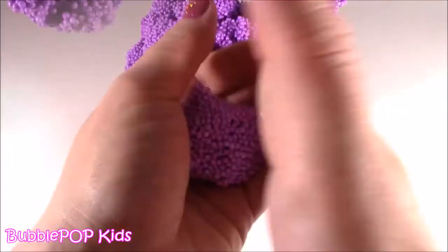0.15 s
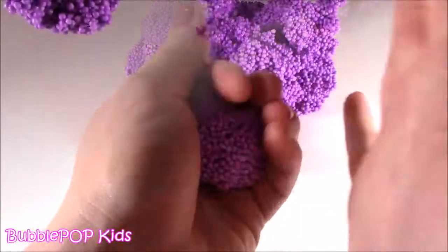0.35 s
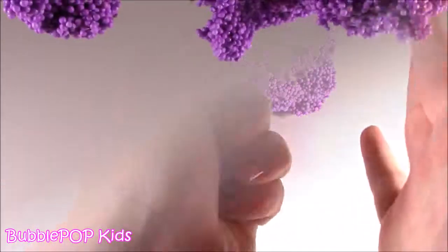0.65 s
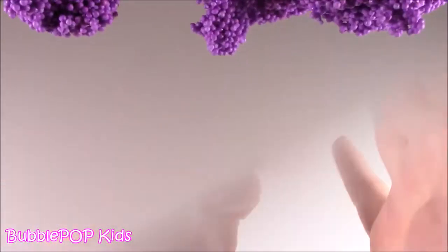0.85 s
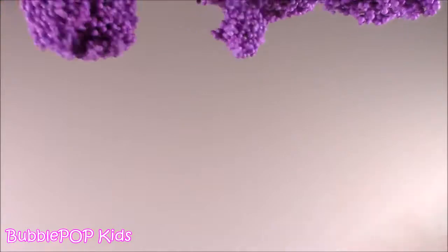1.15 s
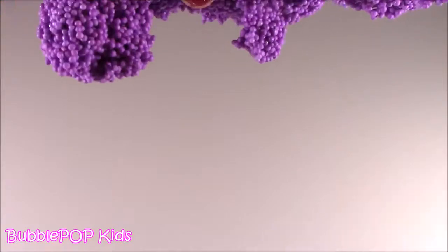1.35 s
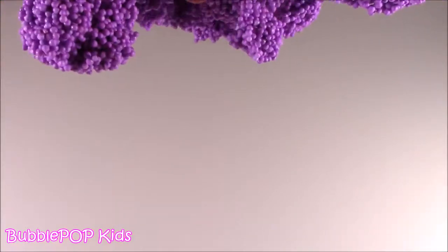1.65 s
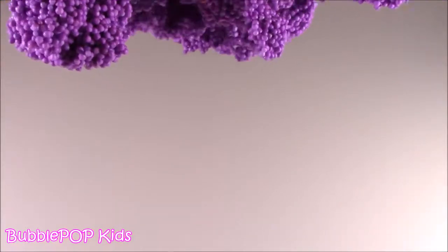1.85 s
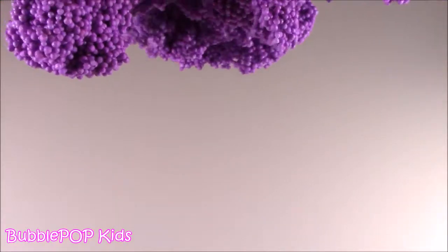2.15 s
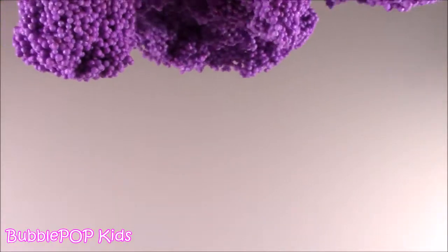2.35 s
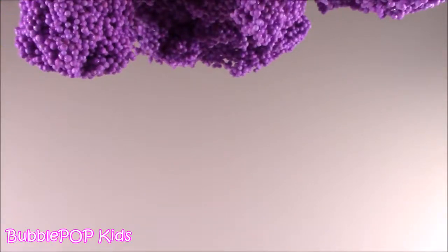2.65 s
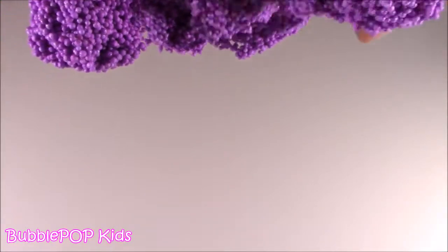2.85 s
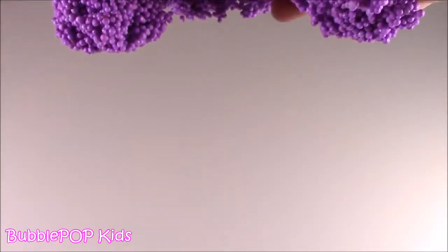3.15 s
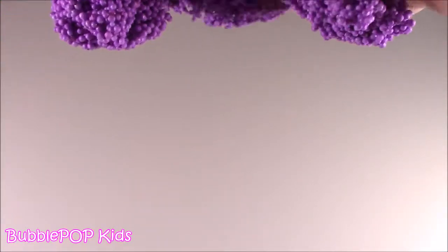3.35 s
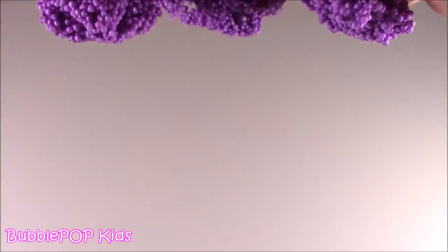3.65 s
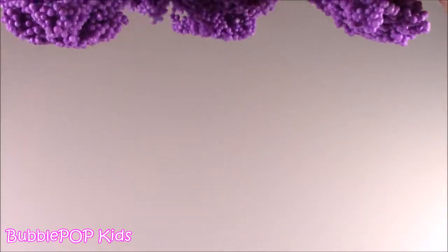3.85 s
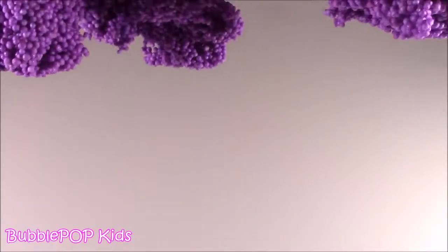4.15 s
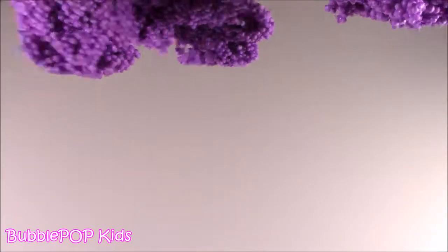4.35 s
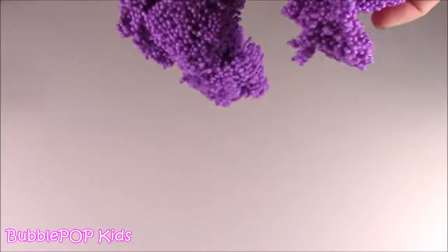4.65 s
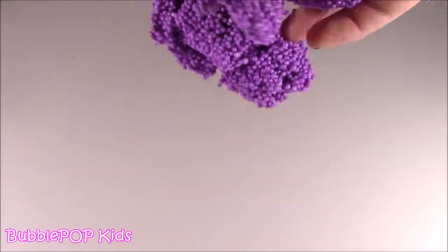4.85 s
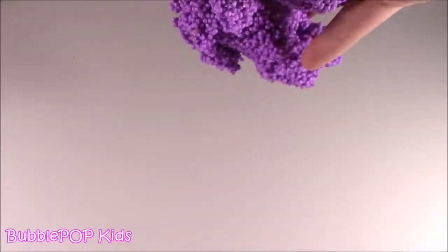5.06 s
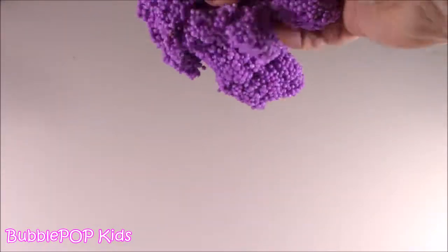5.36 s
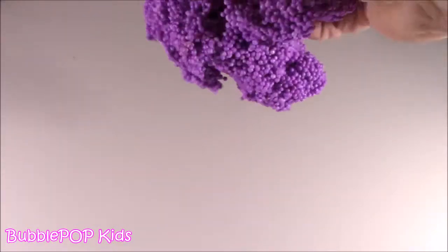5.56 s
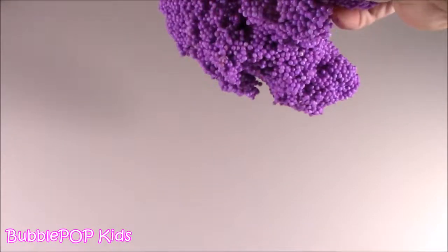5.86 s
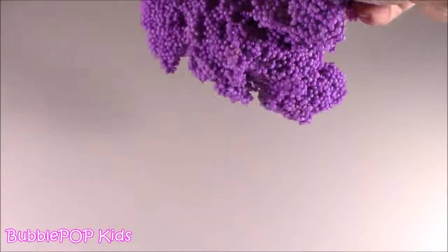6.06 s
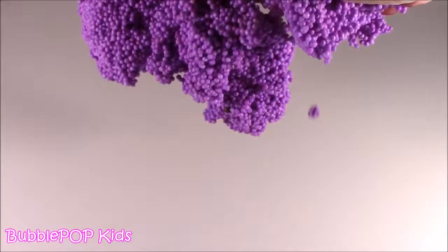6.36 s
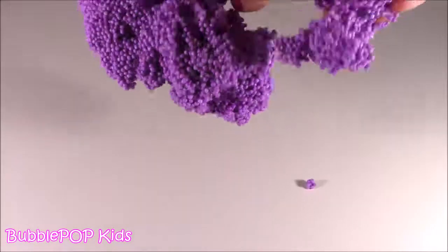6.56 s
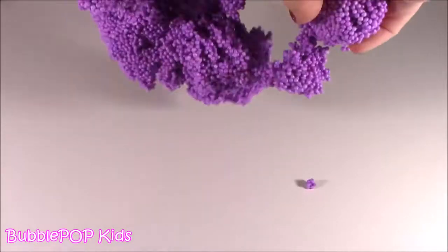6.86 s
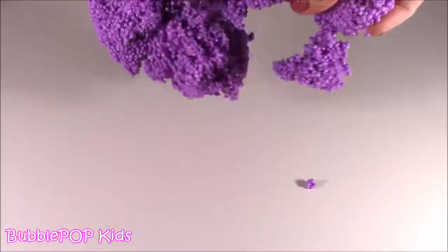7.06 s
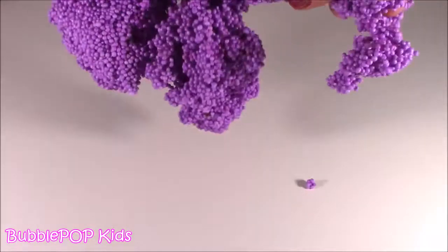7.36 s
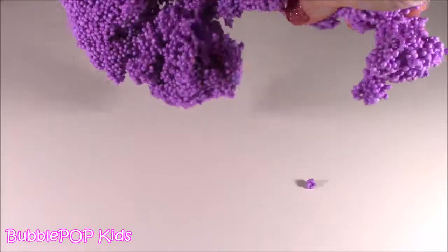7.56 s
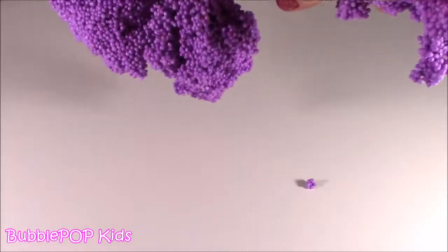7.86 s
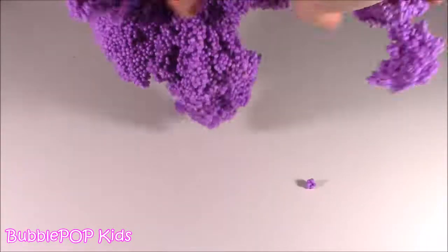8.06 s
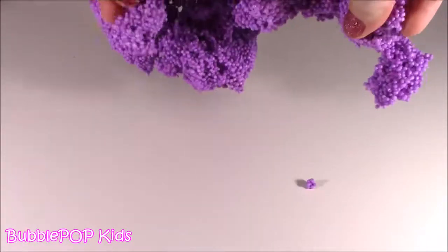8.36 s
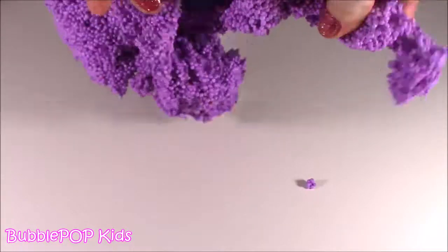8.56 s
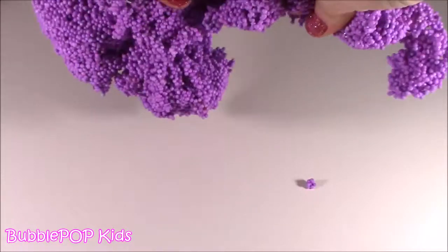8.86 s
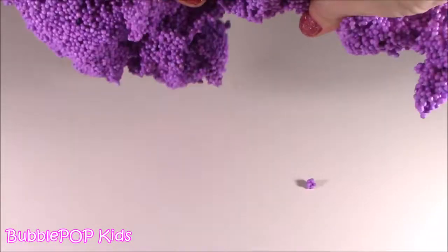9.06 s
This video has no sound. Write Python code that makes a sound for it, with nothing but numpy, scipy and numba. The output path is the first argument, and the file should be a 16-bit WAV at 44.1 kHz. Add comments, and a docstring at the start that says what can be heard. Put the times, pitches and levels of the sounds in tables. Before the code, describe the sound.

Close crunchy crackle of foam-bead putty being kneaded and pulled apart, with sharp pops, dull rustles, soft bumps and brief lulls.

```python
"""Foam-bead compound kneaded and torn

Hands squeeze a sticky foam-bead compound and tear it apart over a table, heard close up in a small quiet room.
Glue threads snap in showers of tiny damped rings, air pockets pop lower down and the kneaded mass rustles dully.
Single snaps and quick crunches add a ring and a gritty crack, hollows resonate as they are pressed shut,
and now and then a lump bumps the table with a low swing and a scuff. Close echoes and a steady low rush surround it."""
import sys
import numpy as np
from scipy import signal
from scipy.fft import rfft, irfft
from scipy.io import wavfile
from numba import njit

SR = 44100
rng = np.random.default_rng(int(sys.argv[2]) if len(sys.argv) > 2 else 0)


def dump(signal):
    """Clip the signal to [-1, 1] and save it as 16-bit WAV at the path in sys.argv[1]."""
    limited = np.clip(np.atleast_2d(signal).T, -1, 1)
    pcm = np.round(limited * 32767).astype(np.int16)
    wavfile.write(sys.argv[1], SR, pcm)


N = 406161  # length in samples


def amp(db):
    """Decibels to gain."""
    return 10 ** (np.asarray(db) / 20)


def rms(x):
    """Root mean square."""
    return np.sqrt(np.mean(x ** 2))


def fade(t, t60):
    """Exponential decay, 60 dB down after t60."""
    return np.exp(-np.log(1000) * t / t60)


def add(track, s, sound):
    """Mix a sound into the track at time s."""
    i = max(int(s * SR), 0)
    track[i:i + len(sound)] += sound[:max(N - i, 0)]


def band(x, lo_hz, hi_hz):
    """Gentle causal band-pass."""
    return signal.sosfilt(signal.butter(2, [lo_hz, hi_hz], "band", fs=SR, output="sos"), x)


def colour(x, points, size=4096):
    """Causal minimum-phase filter through (Hz, dB) points, so that clicks keep their sharp fronts."""
    hz, db = np.transpose(points)
    bins_hz = np.arange(size // 2 + 1) * SR / size
    gain = amp(np.interp(np.log(bins_hz + 1), np.log(hz), db))
    # folding the cepstrum forward in time gives the minimum phase
    cepstrum = irfft(np.log(gain))[:size // 2]
    cepstrum[1:] *= 2
    impulse = irfft(np.exp(rfft(cepstrum, size)))
    return signal.fftconvolve(x, impulse)[:len(x)]


def compound(threads_db, pockets_db, mass_db):
    """Threads, lone bead ticks, air pockets and the shifting mass, all surging together."""
    surge_db = avalanches() + lurches()
    bright = amp(-0.65) * threads(threads_db, surge_db) + amp(-5.5) * beads(threads_db, surge_db)
    dull = pockets(pockets_db, surge_db) + amp(4.0) * mass(mass_db, surge_db)
    return bright + dull


# Tone of the snapping threads and beads: pitch_hz [Hz], gain_db [dB]
THREAD_COLOUR = [(300, -31.5), (1000, -9.5), (1800, -1), (2900, 0), (4000, 3), (4700, -0.5), (5700, 3),
                 (7000, -2), (8200, -9), (9500, -21.5)]


def threads(level_db, surge_db):
    """Glue threads between the beads part in a dense bright crackle of nearly even grains."""
    return shower(level_db, THREAD_COLOUR, rate=2000, growth=0.45, lo_hz=1450, hi_hz=9860,
                  cycles=5.7, spread_db=0.5, ceiling=3.5, surge_db=0.63 * surge_db)


def beads(level_db, surge_db):
    """Lone ticks of beads: sparse, drier than the threads and very uneven in strength."""
    return shower(level_db, THREAD_COLOUR, rate=110, growth=0.41, lo_hz=2030, hi_hz=8950,
                  cycles=2.9, spread_db=4.0, ceiling=3.2, surge_db=0.68 * surge_db)


# Tone of the bursting air pockets: pitch_hz [Hz], gain_db [dB]
POCKET_COLOUR = [(250, -20.5), (540, -8), (740, 1), (920, -3), (1120, -0.5), (1400, 0.5), (1790, -1.5),
                 (2200, -2.5), (3400, -2), (5000, -39)]


def pockets(level_db, surge_db):
    """Air pockets burst with lower pops that ring for more cycles."""
    return shower(level_db, POCKET_COLOUR, rate=800, growth=.7, lo_hz=555, hi_hz=3120,
                  cycles=8.8, spread_db=2.0, ceiling=3.5, surge_db=0.68 * surge_db)


# Tone of the kneaded mass: pitch_hz [Hz], gain_db [dB]
MASS_COLOUR = [(40, -20), (90, -5.5), (135, -0.5), (185, -0.5), (240, -6.5), (310, 3.5), (400, 1.5),
               (500, -0.5), (700, -2), (1500, -15.5)]


def mass(level_db, surge_db):
    """The whole mass shifts with a dull low rustle."""
    return shower(level_db, MASS_COLOUR, rate=320, growth=.3, lo_hz=71.5, hi_hz=674,
                  cycles=5.3, spread_db=2.5, ceiling=2.7, surge_db=0.92 * surge_db)


def shower(curve, points, rate, growth, lo_hz, hi_hz, cycles, spread_db, ceiling, surge_db,
           idle=.08, count=90000):
    """Random grains, about rate a second at the curve's mean dB; harder work frees more and larger ones."""
    when, keep, pitch, strength, sign = rng.random((count, 5)).T
    start = (when * N).astype(int)
    db = curve[start]
    most = count * SR / N  # densest possible shower, grains per s
    density = np.minimum(rate * (idle + amp(growth * (db - np.mean(curve)))), most)
    hz = lo_hz + (hi_hz - lo_hz) * pitch
    t60 = cycles / hz
    # most grains are faint and a few stand out, up to the strength of the glue
    excess_db = spread_db * np.minimum(-np.log(1 - strength), ceiling)
    size = amp(db + excess_db + surge_db[start]) * np.sign(sign - .5) / np.sqrt(density * t60)
    pole = fade(1 / SR, t60) * np.exp(2j * np.pi * hz / SR)
    length = (t60 * SR).astype(int)
    on = keep < density / most
    out = colour(ring(start[on], pole[on], size[on], length[on]), points)
    # settle the overall level on the curve
    return out / rms(out / amp(curve))


@njit
def ring(start, pole, size, length):
    """Sum of short damped oscillations, one for each grain."""
    out = np.zeros(N)
    for k in range(len(start)):
        z = size[k] + 0j
        for i in range(start[k], min(start[k] + length[k], N)):
            out[i] += z.imag
            z *= pole[k]
    return out


def avalanches(rate=110, t60=0.02, spread_db=3.0, ceiling=0.76, size=2000):
    """Brief surges in dB: one thread that parts overloads its neighbours, and the run dies out in some ms."""
    chance, strength = rng.random((2, N))
    kick = amp(spread_db * np.minimum(-np.log(1 - strength), ceiling))
    triggers = (chance < rate / SR) * kick
    surge = np.convolve(triggers, fade(np.arange(size) / SR, t60))[:N]
    return 20 * np.log10(1 + surge)


def lurches(rate=14, spread_db=2.9):
    """Slower unevenness, in dB: the compound sticks and gives several times a second."""
    knots = rng.standard_normal(300)
    return spread_db * np.interp(np.arange(N) / SR * rate, np.arange(len(knots)), knots)


# Pulls that stretch and tear the compound: start_s [s], hardest_s [s], let_go_s [s],
# threads_db [dB], pockets_db [dB]
PULLS = [(.45, .53, 0.63, -53, -55), (1.13, 1.16, 1.62, -59, -66), (1.68, 1.9, 2.1, -52.5, -58.5),
         (2.13, 2.36, 2.8, -42, -47.5), (2.82, 3.23, 3.5, -42.5, -47.5), (3.4, 3.8, 4.163, -37.5, -43),
         (4.96, 5.0, 5.1, -44.5, -50.5), (5.15, 5.4, 5.42, -43, -49), (5.42, 5.56, 5.7, -35, -42.5),
         (5.74, 6.06, 6.16, -30, -38), (6.19, 6.25, 6.37, -34.5, -40), (6.92, 6.99, 7.01, -50, -65.5),
         (7.02, 7.04, 7.15, -42, -54), (7.18, 7.3, 7.52, -33, -45), (7.545, 7.62, 7.68, -29.5, -44),
         (7.7, 7.75, 7.776, -35.5, -41), (8.4, 8.48, 8.52, -39, -54), (8.53, 8.87, 9.16, -29.5, -43.5)]
# Squeezes that knead it: start_s [s], hardest_s [s], let_go_s [s], pockets_db [dB], mass_db [dB]
SQUEEZES = [(.3, .62, .66, -60, -59.5), (.9, 1.1, 1.38, -52, -53.5), (.97, 1.05, 1.08, -42, -52),
            (2.86, 3.3, 4, -50.5, -60), (3.46, 3.7, 3.6, -52.5, -52.5), (4.33, 4.41, 4.43, -36, -45.5),
            (4.55, 4.56, 4.64, -51.5, -56.5), (4.65, 4.66, 4.69, -45, -50), (4.73, 4.74, 4.81, -47, -51),
            (4.8, 5.05, 5.1, -50, -57), (5.28, 5.3, 5.36, -54.5, -54.5), (5.56, 5.59, 5.63, -42.5, -43),
            (6.28, 6.33, 6.39, -38, -51.5), (6.5, 6.6, 6.87, -44.5, -50), (7.89, 7.9, 8.09, -44.5, -51.5),
            (8.17, 8.19, 8.24, -45, -47), (8.268, 8.28, 8.36, -46, -59.5), (8.54, 8.55, 8.58, -38, -49),
            (8.88, 8.92, 8.95, -41, -55)]
# every gesture: quick grip, swell up to its hardest moment, easing, release
PULL_SHAPE = dict(attack_db_per_s=290, swell_db=5.5, ease_db=4, release_db_per_s=149)
SQUEEZE_SHAPE = dict(attack_db_per_s=178.5, swell_db=6.5, ease_db=7, release_db_per_s=188)
RESTING_THREADS_DB, RESTING_POCKETS_DB, RESTING_MASS_DB = -70, -63.5, -65  # the compound creeps in the hands
SQUEEZE_THREADS_DB = -2.5  # threads torn by a squeeze, against its pockets
PULL_MASS_DB = -13  # mass dragged by a pull, against its pockets


def handwork():
    """Levels in dB: pulls tear threads and burst pockets, squeezes burst pockets and shift the mass."""
    pull_threads, pull_pockets = effort(PULLS, PULL_SHAPE)
    squeeze_pockets, squeeze_mass = effort(SQUEEZES, SQUEEZE_SHAPE)
    squeeze_threads = amp(SQUEEZE_THREADS_DB) ** 2 * squeeze_pockets
    pull_mass = amp(PULL_MASS_DB) ** 2 * pull_pockets
    thread_power = pull_threads + squeeze_threads + amp(RESTING_THREADS_DB) ** 2
    pocket_power = pull_pockets + squeeze_pockets + amp(RESTING_POCKETS_DB) ** 2
    mass_power = pull_mass + squeeze_mass + amp(RESTING_MASS_DB) ** 2
    return 10 * np.log10([thread_power, pocket_power, mass_power])


def effort(rows, shape):
    """Summed power of a table of gestures, for each of its two level columns."""
    return sum(np.outer(amp(row[3:]) ** 2, gesture(*row[:3], **shape)) for row in rows)


def gesture(start, hardest, end, attack_db_per_s, swell_db, ease_db, release_db_per_s):
    """Power of one movement of the hands over time, 1 at its hardest."""
    t = np.arange(N) / SR
    held_db = np.interp(t, [start, hardest, end], [-swell_db, 0, -ease_db])
    edges_db = attack_db_per_s * np.maximum(start - t, 0) + release_db_per_s * np.maximum(t - end, 0)
    return amp(np.maximum(held_db - edges_db, -100)) ** 2


# Hollows, such as the space between cupped hands, as they are pressed shut: start_s [s], hardest_s [s], shut_s
# [s], # level_db [dB], pitch_hz [Hz], width_hz [Hz]
HOLLOWS = [(0.941, 1.044, 1.045, -40, 1440, 485), (0.96, 1.008, 1.06, -42.5, 900, 260),
           (1.002, 1.015, 1.074, -39, 2840, 219), (6.572, 6.595, 6.61, -36, 362, 260)]
HOLLOW_SHAPE = dict(attack_db_per_s=1797, swell_db=4.5, ease_db=3, release_db_per_s=1000)


def hollow(rate=1100):
    """Breaking threads ring the air in a hollow, such as between cupped hands, which gives a throaty crunch or
    a round pop."""
    out = np.zeros(N)
    clicks = (rng.random(N) < rate / SR) * rng.uniform(-1.3, 1, N)
    for start, hardest, shut, db, hz, width in HOLLOWS:
        ringing = band(clicks, hz - width / 2, hz + width / 2)
        press = np.sqrt(gesture(start, hardest, shut, **HOLLOW_SHAPE))
        out += amp(db) * ringing / rms(ringing) * press
    return out


# Single snaps that stand out: start_s [s], level_db [dB, peak of the pop before crack and trim], pitch_hz [Hz]
SNAPS = [(.322, -41, 2300), (.515, -43, 4230), (0.551, -32, 5000), (0.6173, -33.5, 1580),
         (.641, -34.5, 930), (.892, -35, 1080), (.963, -25.5, 4210), (0.9922, -19, 2200),
         (1.0126, -14.5, 4500), (1.0509, -15.5, 1460), (1.0525, -17, 5300), (1.0645, -6, 2850),
         (1.0745, -21, 4700), (1.09, -18, 3180), (1.171, -27, 3750), (1.3613, -26, 1980),
         (1.599, -32.5, 5700), (1.6496, -29, 1170), (1.651, -30, 4160), (1.893, -38, 1107),
         (2.062, -29, 4300), (2.1075, -21, 3600), (2.5774, -16, 4784), (2.6692, -21, 4970),
         (2.7827, -18.5, 4260), (2.957, -23.5, 3690), (3.1112, -19.5, 3454), (3.4688, -15.5, 5100),
         (4.1385, -12, 3970), (4.245, -26.5, 3320), (4.437, -24, 1550), (4.5447, -14.5, 2940),
         (4.6609, -19, 1480), (4.684, -20, 1930), (4.7207, -23, 1870), (4.7405, -20.5, 2456),
         (4.8009, -19, 3180), (4.811, -25, 1520), (4.9724, -25, 2943), (5.3773, -25.5, 2020),
         (5.5424, -15.5, 4830), (5.557, -21, 1719), (5.8858, -5.5, 4340), (5.934, -22, 1122),
         (6.0842, -7.5, 4600), (6.1005, -8.5, 3670), (6.3185, -28, 5500), (6.3287, -6, 1450),
         (6.369, -17, 2100), (6.555, -21.5, 2370), (6.677, -18, 3570), (7.072, -20.5, 5380),
         (7.2597, -20, 5440), (7.3079, -17, 1490), (7.5494, -11, 3780), (7.5957, -7.5, 5510),
         (7.637, -14, 5560), (7.6513, -21, 4000), (7.6595, -9, 5180), (7.7728, -14.5, 5150),
         (7.8956, -24, 2165), (8.069, -28, 1910), (8.0812, -28.5, 1646), (8.126, -29.5, 1420),
         (8.268, -24, 2790), (8.281, -25, 2470), (8.373, -20.5, 3970), (8.387, -26, 2916),
         (8.432, -23, 3780), (8.444, -23.5, 2230), (8.4895, -10.5, 5160), (8.533, -11.5, 3950),
         (8.562, -11.5, 5060), (8.7, -9, 4460), (8.8048, -13, 3300), (8.895, -11, 4250),
         (8.9039, 3.5, 4500), (8.9125, -7, 3890), (8.9955, -15, 1500), (9.029, -24, 6920)]


def all_snaps(threads_db):
    """Single snaps, the runs inside crunches and the chance snaps of the crackle, all sounded alike."""
    return snaps([*SNAPS, *crunch_snaps(), *lesser_snaps(threads_db)])


def snaps(rows, ring_t60=0.00095, cycles=6.1, second_s=0.000894, second_hz=5100, second_octaves=.4,
          second_db=-6, second_t60=0.0029, crack_t60=0.0078, crack_db=-13, crack_growth=0.86,
          body_hz=1580, body_db=-15, body_t60=0.0069, top_hz=7900, size=2000):
    """A strand or pocket rings, a thin neighbour follows, the lump is knocked; small snaps crack relatively more."""
    out, t = np.zeros(N), np.arange(size) / SR
    later = np.maximum(t - second_s, 0)
    neighbours_hz = second_hz * 2 ** (second_octaves * rng.uniform(-1.06, 1, len(rows)))
    noise = rng.standard_normal((len(rows), size))
    cracks = band(noise * np.abs(noise), lo_hz=1010, hi_hz=top_hz)  # spiky noise sounds gritty
    body = amp(body_db) * np.sin(2 * np.pi * body_hz * t) * fade(t, body_t60)
    for (s, db, hz), neighbour_hz, crack in zip(rows, neighbours_hz, cracks):
        strand = np.sin(2 * np.pi * hz * t) * fade(t, ring_t60 + cycles / hz)
        neighbour = amp(second_db) * np.sin(2 * np.pi * neighbour_hz * later) * fade(later, second_t60)
        neighbour = neighbour * min(np.sqrt(hz / second_hz), 1)
        # a small source radiates little below its own pitch
        pop = band(strand + body + neighbour, lo_hz=min(0.48 * hz, 1100), hi_hz=top_hz)
        grit = amp(crack_db + crack_growth * db) * crack / rms(crack) * fade(t, crack_t60)
        add(out, s, amp(db) * pop / np.max(np.abs(pop)) + grit)
    return amp(-2.0) * signal.sosfilt(signal.butter(4, top_hz, fs=SR, output="sos"), out)


# Crunches, where a clump of beads gives way in a quick run of snaps: start_s [s],
# level_db [dB, strongest possible snap, as in SNAPS], pitch_hz [Hz, centre], length_s [s]
CRUNCHES = [(1.0135, -28, 3900, 0.0065), (1.062, -16.5, 3900, 0.0057), (1.275, -34.5, 2520, 0.0053),
            (2.821, -19, 2830, 0.015), (4.413, -18, 2780, 0.0093), (4.548, -26.5, 2270, 0.0088),
            (4.642, -26.5, 2200, 0.0072), (4.683, -25, 1670, 0.0079), (4.739, -25, 2370, 0.008),
            (4.802, -31, 2200, 0.0024), (5.581, -21, 2020, 0.0082), (5.606, -16.5, 2980, .012),
            (6.208, -14, 3960, 0.0087), (6.25, -15.5, 3270, 0.019), (7.282, -21, 4000, .01),
            (7.415, -13, 3970, 0.0087), (8.622, -16, 4100, 0.0084), (8.673, -14, 3870, .012),
            (8.702, -16, 2940, 0.0078), (8.779, -13, 3380, 0.0073), (8.926, -8, 3450, .018)]


def crunch_snaps(spread_db=6, spread_octaves=0.92, count=5):
    """Snap rows within each crunch: unevenly spaced, each with its own strength and pitch."""
    rows = []
    for s, db, hz, length in CRUNCHES:
        when, weakness, pitch = rng.random((count, 3)).T
        times = s + length * (np.arange(count) + when) / count
        pitches_hz = hz * 2 ** (spread_octaves * (2 * pitch - 1))
        rows += zip(times, db - spread_db * weakness, pitches_hz)
    return rows


def lesser_snaps(threads_db, above_db=6.5, spread_db=2.5, lo_hz=1600, hi_hz=6000, count=110):
    """Snap rows at chance moments, their levels set above that of the threads around them."""
    when, strength, pitch = rng.random((count, 3)).T
    db = threads_db[(when * N).astype(int)] + above_db + spread_db * (2 * strength - 1)
    return np.transpose([when * N / SR, db, lo_hz + (hi_hz - lo_hz) * pitch])


# Lumps and fingers bumping down: start_s [s], level_db [dB, of the swing before band-pass],
# pitch_hz [Hz], t60_s [s]
BUMPS = [(0.612, -38.5, 114.4, 0.031), (1.064, -31.5, 116.1, 0.032), (1.65, -32, 349, 0.014),
         (1.894, -31.5, 152.8, 0.019), (2.826, -35, 114, 0.079), (3.468, -24, 146, 0.06),
         (4.408, -34, 131, 0.13), (4.65, -28, 364, 0.03), (4.66, -24, 124, 0.021), (5.626, -39, 169, 0.025),
         (5.754, -30.5, 122, 0.027), (5.987, -28, 368, 0.035), (6.508, -27.5, 445, 0.025),
         (6.6762, -28, 298, 0.018), (8.1255, -29, 420.6, 0.019)]


def bumps(scuff_db=-3, size=9000):
    """A soft lump meets the table: one damped low swing and a dull scuff of beads."""
    out, t = np.zeros(N), np.arange(size) / SR
    for (s, db, hz, t60), noise in zip(BUMPS, rng.standard_normal((len(BUMPS), size))):
        swing = np.sin(2 * np.pi * hz * t)
        scuff = band(noise, lo_hz=113, hi_hz=707)
        sound = (swing + amp(scuff_db) * scuff / rms(scuff)) * fade(t, t60)
        add(out, s, amp(db) * sound)
    return band(out, lo_hz=83, hi_hz=3000)


# Early echoes from the table and nearby things: delay_s [s, before sway], gain [linear]
ECHOES = [(.0011, 0.14), (.0068, 0.06), (0.013, 0.087)]


def room(x, t60=0.064, wet_db=-11, width=0.35, sway=0.16, size=12000, count=50):
    """Close echoes and a short diffuse tail; the hands keep moving, so the reflections keep changing."""
    out, t = np.zeros((2, N)), np.arange(size) / SR
    hop = N // count
    for centre in range(0, N + hop, hop):
        i = np.arange(max(centre - hop, 0), min(centre + hop, N))
        # the tail builds up over some ms, then dies away
        mid, side = rng.standard_normal((2, size)) * fade(t, t60) * (1 - fade(t, 0.0058))
        response = amp(wet_db) * (mid + width * np.array([side, -side])) / np.sqrt(np.sum(mid ** 2))
        response[:, 0] += 1  # direct sound
        for delay, gain in ECHOES:
            response[:, int(delay * SR * (1 + sway * rng.uniform(-1, 1)))] += gain
        piece = x[i] * (1 - np.abs(i - centre) / hop)  # overlapping pieces crossfade
        for channel, path in zip(out, response):
            add(channel, i[0] / SR, signal.fftconvolve(piece, path))
    return out


# Tone of the still room: pitch_hz [Hz], gain_db [dB]
AIR_COLOUR = [(20, -17), (50, 1), (130, 3.5), (280, 2), (600, -5), (1500, -10), (4000, -15), (7000, -24),
              (9500, -55.5)]


def air(level_db=-60, width=0.5):
    """Steady low rush of the room: shared noise, plus a weaker part of opposite sign on the two sides."""
    mid, side = (colour(noise, AIR_COLOUR) for noise in rng.standard_normal((2, N)))
    return amp(level_db) * (mid + width * np.array([side, -side])) / rms(mid)


def scene():
    """The compound in the middle, with the room around it."""
    threads_db, pockets_db, mass_db = handwork()
    crackle = compound(threads_db, pockets_db, mass_db) + hollow()
    handling = crackle + all_snaps(threads_db) + bumps()
    return room(handling) + air()


def record(dry, top_hz=9400):
    """The recorder rounds loud peaks softly and cuts the top steeply."""
    rounded = .7 * np.tanh(dry / .7)
    return signal.sosfilt(signal.ellip(10, .2, 75, top_hz, fs=SR, output="sos"), rounded)


dry = scene()
out = record(dry)
dump(out)
```